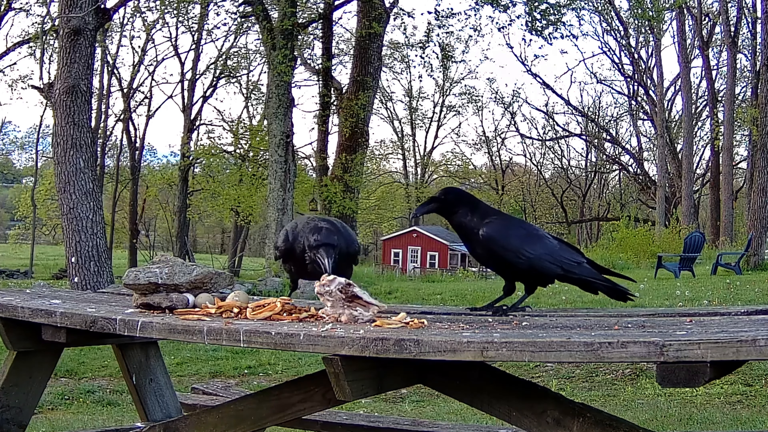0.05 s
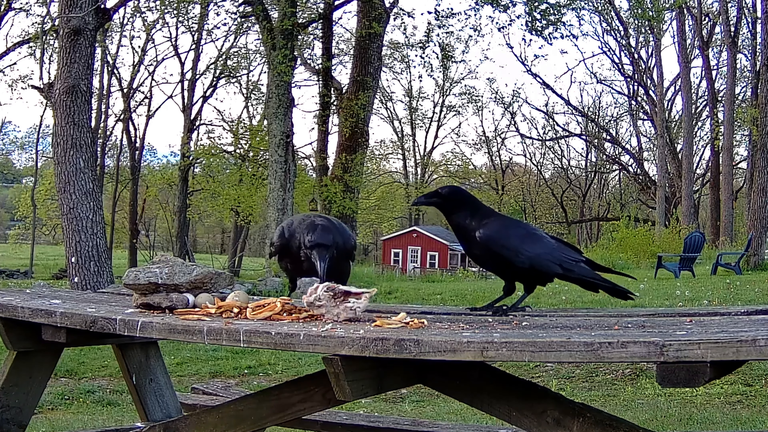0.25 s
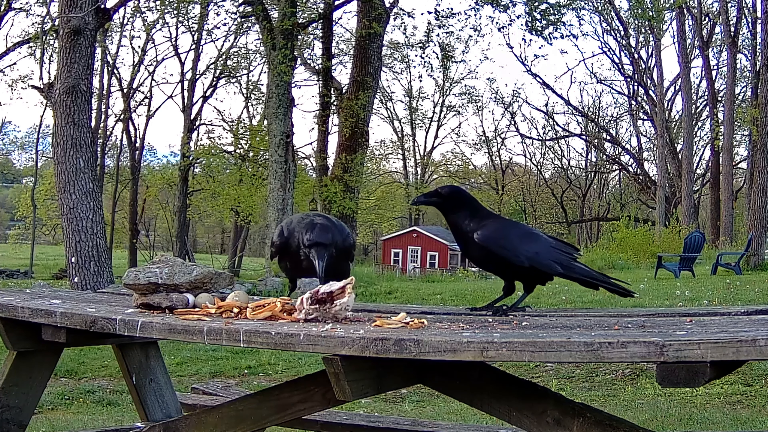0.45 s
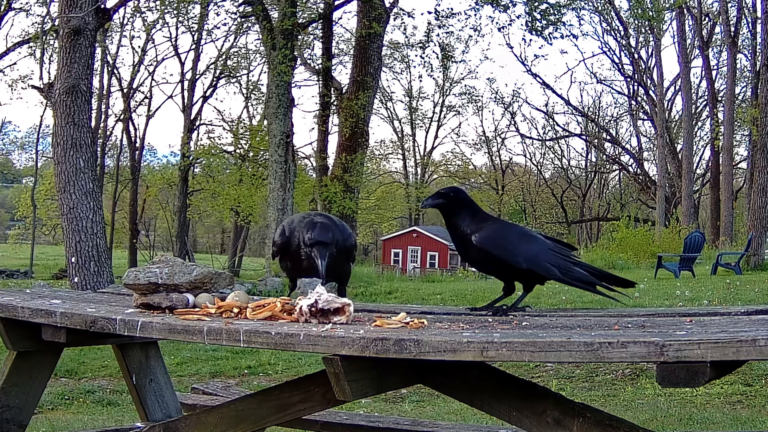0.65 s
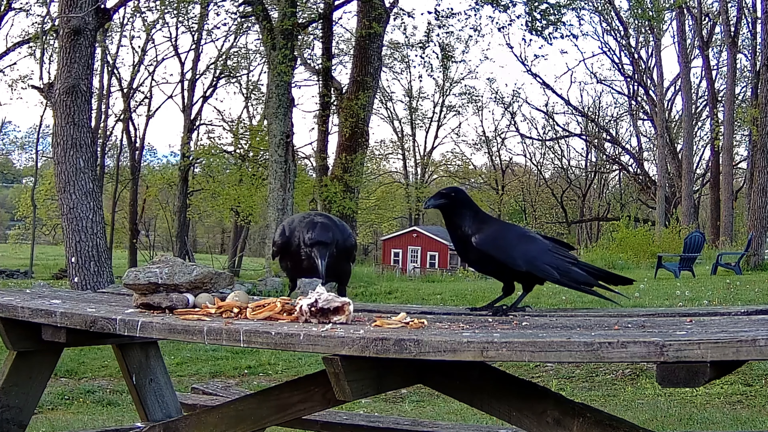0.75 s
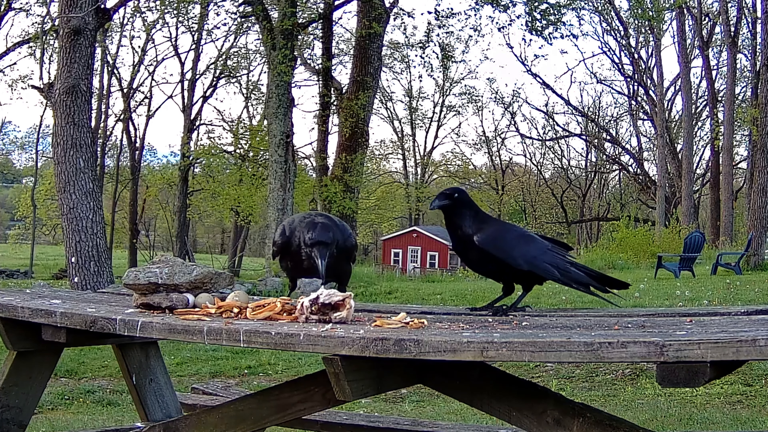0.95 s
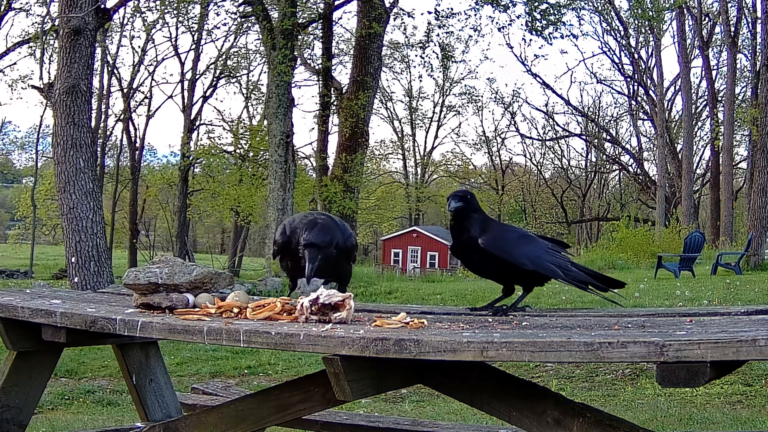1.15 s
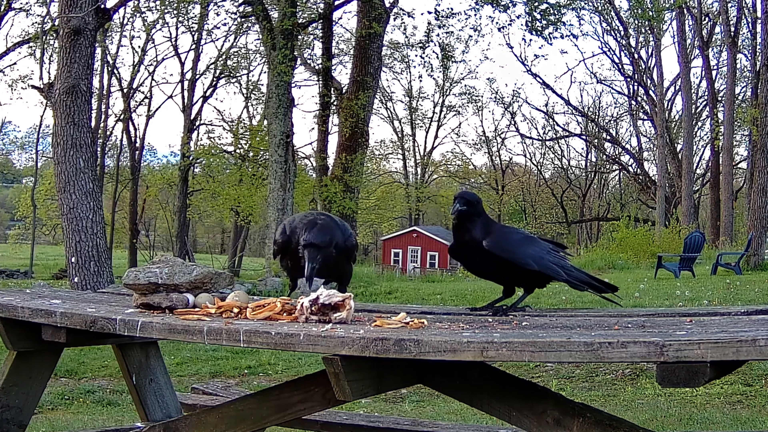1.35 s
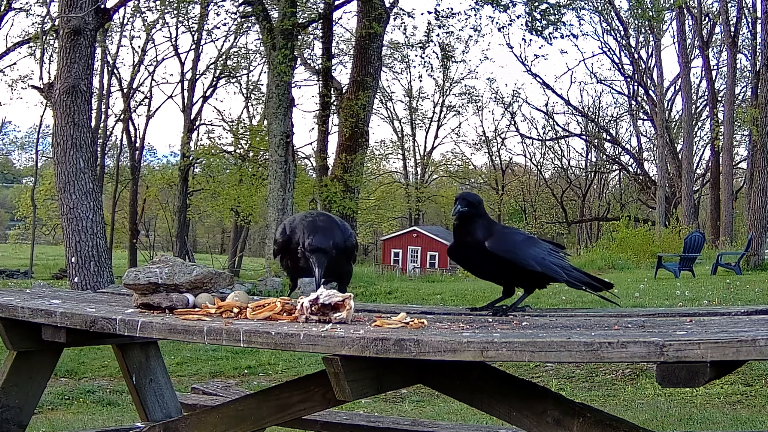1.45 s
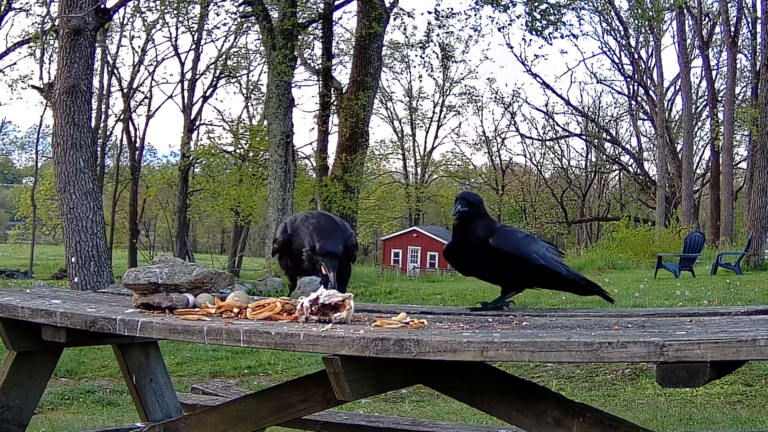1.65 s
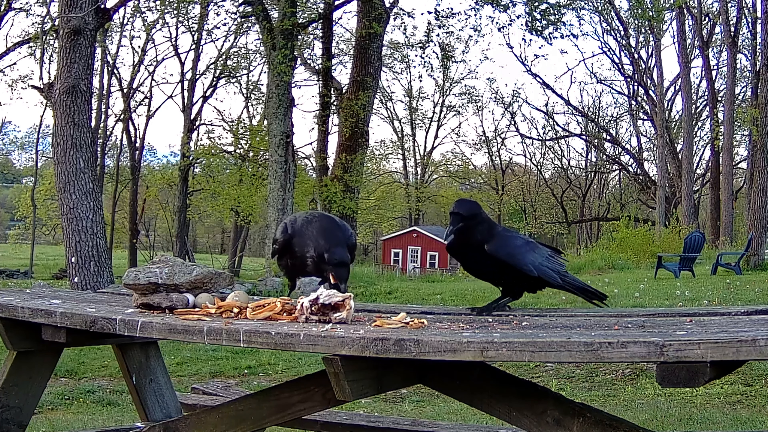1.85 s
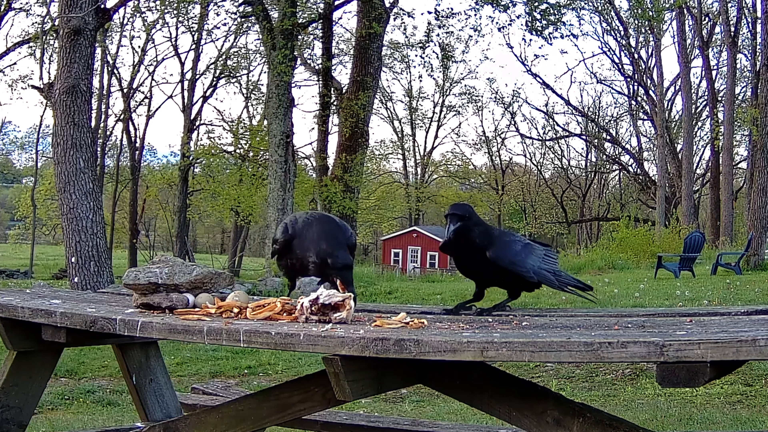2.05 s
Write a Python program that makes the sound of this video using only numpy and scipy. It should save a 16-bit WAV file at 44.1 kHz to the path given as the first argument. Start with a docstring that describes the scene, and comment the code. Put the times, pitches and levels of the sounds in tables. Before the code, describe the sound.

A raven gives one loud, harsh croak close to the microphone. After a pause come a low rattle and two softer croaks. Songbirds whistle and chirp faintly at the edge of a wood, over a soft rumble of air.

```python
"""Ravens at a picnic table

Two ravens feed close to the microphone at the edge of a wood. One gives a loud, harsh croak; a low
rattle and two softer croaks follow. Each call is a run of slow throat pulses that ring the windpipe.
Songbirds whistle far off in the trees, a small bird chirps nearby, and the air rumbles faintly."""
import sys
import numpy as np
from scipy import signal
from scipy.fft import rfft, irfft
from scipy.io import wavfile
from scipy.ndimage import uniform_filter1d

SR = 44100
rng = np.random.default_rng(int(sys.argv[2]) if len(sys.argv) > 2 else 0)


def put_to_file(sound):
    """Save the sound as 16-bit audio at rate SR, in the file named by the first command-line argument."""
    columns = np.atleast_2d(sound).T  # one column per channel
    safe = np.clip(columns, -1, 1)
    whole_steps = np.round(safe * 32767)
    wavfile.write(sys.argv[1], SR, whole_steps.astype(np.int16))


N = 92610


def amp(db):
    """Decibels to gain."""
    return 10 ** (np.asarray(db) / 20)


def unit(x):
    """Scales to rms 1."""
    return x / np.sqrt(np.mean(x ** 2) + 1e-20)


def add(mix, start_s, sound):
    """Mixes a sound in at a time."""
    part = mix[max(round(start_s * SR), 0):][:len(sound)]
    part += sound[:len(part)]


def colour(x, points):
    """Filters by a curve of freq_hz, gain_db points."""
    hz, db = np.transpose(points)
    log_hz = np.log(np.fft.rfftfreq(len(x), 1 / SR) + 1)
    return irfft(rfft(x) * amp(np.interp(log_hz, np.log(hz), db)), len(x))


def echoes(x, t60_s, delay_s, dull_hz):
    """Scattered reflections that die away and lose treble."""
    t = np.arange(SR) / SR
    taps = rng.standard_normal(SR) * (rng.random(SR) < 1 / 20)
    taps *= (t > delay_s) * amp(-60 * t / t60_s)
    taps = signal.lfilter(*signal.butter(1, dull_hz, fs=SR), taps / np.linalg.norm(taps))
    return signal.fftconvolve(x, taps)[:N]


# Open air at the wood's edge: freq_hz, relative_db
AIR_SPECTRUM = [(28, -35.5), (48, 0.5), (119, -2.5), (172, -14), (254, -12), (419, -25.5), (933, -15.5),
                (2820, -25), (6410, -40.5), (8500, -53.5), (11000, -94)]


def air():
    """Low rumble and a soft distant wash all around the microphone."""
    return amp(-41.5) * unit(colour(rng.standard_normal(N), AIR_SPECTRUM))


def pulses(call, tone=((0, 0),)):
    """Time and level of each throat pulse, and the phase in turns of the tone that it chops."""
    times, rate_hz, db = np.transpose(call)
    t = np.arange(times[0], times[-1], 1 / SR)
    count = np.cumsum(np.interp(t, times, rate_hz)) / SR
    starts = np.interp(np.arange(int(count[-1]) + 1), count, t)
    tone_turns = np.cumsum(np.interp(t, *np.transpose(tone))) / SR
    return zip(starts, np.interp(starts, times, db), np.interp(starts, t, tone_turns))


def ring(throat, db, tilt_db_per_octave, turns, glide):
    """One pulse rings the throat, a little differently each time; the ring bends upward by glide."""
    uneven_db, pitch_jitter, slip_turns, glide_ms = 1.3, 0.014, 0.055, 4.4
    hz, gain_db, rise_ms, decay_ms = np.transpose(throat)[:, :, None]
    ms = np.arange(SR // 32) * 1000 / SR
    gain_db = gain_db + uneven_db * rng.standard_normal(hz.shape)
    envelope = (1 - np.exp(-(ms / rise_ms) ** 2)) * np.exp(-ms / decay_ms)
    envelope *= amp(gain_db + tilt_db_per_octave * np.log2(hz / hz[0])) / envelope.max(1, keepdims=True)
    hz = hz * (1 + pitch_jitter * rng.standard_normal(hz.shape))
    bent_ms = ms - rise_ms / 2 + glide * glide_ms * np.log(np.cosh((ms - rise_ms) / glide_ms))
    phase = turns + slip_turns * rng.standard_normal(hz.shape) + hz * bent_ms / 1000
    wave = (envelope * np.sin(2 * np.pi * phase)).sum(0)
    return amp(db) * wave / np.sqrt(np.sum(wave ** 2) / (SR / 100))  # as much energy as 10 ms at db


# The throat passes little bass: freq_hz, gain_db
THROAT_BASS_CUT = [(250, -24), (390, 0.5)]
# Colour of the rasp on each pulse: freq_hz, hollow_db, open_db
RASP_SPECTRA = [(1300, -23.5, -25.5), (1645, 13.5, 10.5), (2100, 4, 1.5), (2277, 11.5, 6),
                (2720, -18.5, -2.5), (3020, -12, 0.5), (3180, 5.5, 5), (3480, 3.5, 1.5), (3820, 7, 11),
                (4240, -15.5, 1), (4340, -15, -10.5), (4850, 4, -1), (5500, 3, 4.5), (6390, -3, -2),
                (7230, -13, -11), (7470, -12, -15), (9120, -50, -50)]


def voice(beats, throat_at, full_db, brighten, rasp_db, rasp_follow, glide=0.032, snap=1.5, opening=0):
    """Throat pulses, brighter with effort, each with a snap and a rasp that fills as the throat opens."""
    shimmer_db, rasp_decay_ms, rasp_floor = 0.5, 4, 0.11
    body, puffs = np.zeros(N), np.zeros(N)
    ms = np.arange(SR // 70) * 1000 / SR
    for start_s, db, turns in beats:
        throat, effort_db = throat_at(start_s), db - full_db
        pulse_db = db + shimmer_db * rng.standard_normal()
        add(body, start_s, ring(throat, pulse_db, brighten * effort_db, turns, glide))
        puff = (np.exp(-ms / rasp_decay_ms) + rasp_floor) * rng.standard_normal(len(ms))
        puff[0] += snap
        rise_s = np.mean(throat, 0)[2] / 1000
        add(puffs, start_s + rise_s, amp(full_db + rasp_follow * effort_db) * puff)
    hz, hollow_db, open_db = np.transpose(RASP_SPECTRA)
    rasp = colour((1 - opening) * puffs, np.c_[hz, hollow_db])
    rasp += colour(opening * puffs, np.c_[hz, open_db])
    return colour(body, THROAT_BASS_CUT) + amp(rasp_db) * rasp


# Single low clucks at the table: start_s, level_db
CLUCKS = [(.013, -41), (.532, -37), (0.663, -38.5), (1.334, -41.5), (1.344, -35.5), (1.373, -36)]
# The low rattle: time_s, pulse_rate_hz, level_db
RATTLE = [(1.4033, 73.3, -33.2), (1.42, 67.6, -42.3), (1.45, 65.1, -38.2), (1.48, 63.8, -25.7),
          (1.52, 63.9, -24.3), (1.56, 62.9, -28.8), (1.591, 60.6, -25.6), (1.607, 63.7, -36.2),
          (1.626, 66.1, -41)]
# Throat resonances, beak shut: pitch_hz, relative_db, rise_ms, decay_ms
THROAT_SHUT = [(457, -4, 2.36, 5.9), (548.5, 3.5, 2.93, 4.45), (1048, -16, 2.7, 2.4)]


def clucks_and_rattle():
    """Lone throat pulses and one slow run of them, close by but quiet behind a shut beak."""
    clucks = [(start_s, db, 0) for start_s, db in CLUCKS]
    return voice([*clucks, *pulses(RATTLE)], lambda s: THROAT_SHUT,
                 full_db=-37.5, brighten=0.45, rasp_db=-61, rasp_follow=0.84)


# Dull thumps on the table, peaking halfway through swell_s: start_s, pitch_hz, peak_db, swell_s
PLANK_THUMPS = [(.228, 111, -28.5, 0.018), (.234, 185, -31, 0.012), (1.69, 172.3, -41, 0.045)]
# Small dry ticks of beaks at the food: start_s, level_db
BEAK_TICKS = [(0.586, -45.5), (1.587, -42), (1.604, -42), (1.622, -44)]


def feeding():
    """Beaks tick and the planks thump, close to the microphone."""
    tick_hz, half_width_hz, tick_decay_s = 6120, 320, 0.0019
    out, t = np.zeros(N), np.arange(SR // 5) / SR
    band = signal.butter(2, [tick_hz - half_width_hz, tick_hz + half_width_hz], "band", fs=SR)
    for start_s, db in BEAK_TICKS:
        hiss = unit(signal.lfilter(*band, rng.standard_normal(len(t))))
        add(out, start_s, amp(db) * hiss * np.exp(-t / tick_decay_s))
    for start_s, hz, db, swell_s in PLANK_THUMPS:
        envelope = 2 * t / swell_s * np.exp(1 - 2 * t / swell_s)
        add(out, start_s, amp(db) * envelope * np.sin(2 * np.pi * hz * t))
    return out


# The loud croak, at close range: time_s, pulse_rate_hz, level_db
LOUD_CROAK = [(0.2343, 114.2, -26.8), (0.243, 109.0, -17.8), (0.263, 98.4, -18.6), (0.275, 92.8, -13.0),
              (0.318, 88.2, -13.0), (0.33, 87.0, -15.5), (0.353, 84.5, -13.0), (0.364, 83.4, -15.5),
              (0.3755, 90.5, -20.5), (0.388, 82.5, -11.4), (0.413, 78.7, -10.2), (0.464, 74.3, -11.4),
              (0.479, 75.0, -21.0), (0.492, 73.7, -24.2), (0.508, 72.6, -16.3)]
# A second, higher tone in the throat, chopped by the pulses: time_s, pitch_hz
CROAK_TONE = [(.31, 728), (.35, 748), (.39, 780), (.45, 814)]
# Throat resonances as the croak starts and as it ends: pitch_hz, relative_db, rise_ms, decay_ms
THROAT_START = [(419, 1, 0.64, 1.62), (582, -1, 0.079, 2.9), (721, 0.5, 0.83, 5.3), (1133, 4.5, 0.32, 3.5),
                (1268, -12, 1, 2.3), (1820, -15, 0.09, 1.3)]
THROAT_END = [(528, -7.5, 0.7, 7.2), (612, -4, 1.42, 2), (831, -17, 2.4, 6.5), (1128, 3.5, 2.9, 1.96),
              (1315, -4.5, 3.2, 0.95), (1740, -24.5, 2.4, 1.4)]


def loud_croak():
    """The throat shifts shape as the pulses slow down; the rasp fills out at the climax."""
    shift_s, climax_s = (0.345, 0.425), (0.37, 0.41, 0.465, 0.495)

    def throat_at(time_s):
        share = np.interp(time_s, shift_s, [0, 1])
        return (1 - share) * np.array(THROAT_START) + share * np.array(THROAT_END)
    opening = np.interp(np.arange(N) / SR, climax_s, [0, 1, 1, 0])
    return voice(pulses(LOUD_CROAK, CROAK_TONE), throat_at, full_db=-8.5, brighten=0.35,
                 rasp_db=-7.5, rasp_follow=1.49, glide=0.035, snap=5.4, opening=opening)


def song(contours, waver, fade_s):
    """Nearly pure gliding whistles with a slight waver."""
    out = np.zeros(N)
    for contour in contours:
        times, hz, db = np.transpose(contour)
        t = np.arange(times[0], times[-1], 1 / SR)
        wobble = unit(uniform_filter1d(rng.standard_normal(len(t)), size=120))
        pitch_hz = uniform_filter1d(np.interp(t, times, hz), size=200) * (1 + waver * wobble)
        fade = np.clip(np.minimum(t - times[0], times[-1] - t) / fade_s, 0, 1)
        tone = np.sqrt(2) * np.sin(2 * np.pi * np.cumsum(pitch_hz) / SR)
        add(out, times[0], fade * amp(np.interp(t, times, db)) * tone)
    return out


# Whistled phrases far off in the trees: time_s, pitch_hz, relative_db
FAR_WHISTLES = [
    [(.475, 2296, -50), (.5, 2480, -34.5), (.522, 2315, -37), (.543, 2452, -35), (.56, 2258, -38),
     (.582, 2364, -38), (.605, 2210, -38.5), (.626, 2312, -41.5), (.66, 2238, -50), (.73, 2180, -47)],
    [(.872, 2262, -48), (.9, 2320, -39), (.936, 2300, -39), (.965, 2150, -56)],
    [(.922, 3386, -43.5), (.952, 3387, -45.5)],
    [(1.036, 2578, -41), (1.068, 2310, -48), (1.105, 2500, -36)],
    [(1.245, 2210, -62.5), (1.272, 2867, -41.5), (1.29, 2850, -56)],
    [(1.55, 3050, -58), (1.58, 2932, -43), (1.625, 2988, -62), (1.68, 2960, -43), (1.71, 2580, -57)],
]
# Faint high chirps, just as distant: time_s, pitch_hz
FAR_CHIRPS = [
    [(.712, 6550), (.75, 6120), (.795, 6620)],
    [(1.75, 6000), (1.85, 5270), (1.89, 5520)],
]
# Chirps of a small nearby bird, with a faint echo of the first: time_s, pitch_hz, level_db
NEAR_CHIRPS = [
    [(1.879, 3530, -55), (1.89, 4710, -40), (1.91, 5770, -34), (1.919, 6000, -54)],
    [(1.96, 4300, -49), (1.979, 4270, -45.5)],
    [(2.0, 5430, -39.5), (2.012, 5200, -53), (2.026, 4030, -43.5), (2.042, 5820, -34.5), (2.049, 5920, -32),
     (2.059, 5910, -42)],
]


def songbirds(faint_db=-61):
    """Far whistles and nearer chirps, echoing among the trees."""
    faint = [[(time_s, hz, faint_db) for time_s, hz in chirp] for chirp in FAR_CHIRPS]
    far = song(FAR_WHISTLES + faint, waver=0.0081, fade_s=0.0055)
    near = song(NEAR_CHIRPS, waver=0.017, fade_s=0.0015)
    far_echo = amp(-5.5) * echoes(far, t60_s=0.36, delay_s=0.006, dull_hz=7980)
    near_echo = amp(-8.5) * echoes(near, t60_s=0.5, delay_s=0.0023, dull_hz=11000)
    return amp(-1) * far + far_echo + near + near_echo


# Two softer croaks at the table: time_s, pulse_rate_hz, level_db
SOFT_CROAK = [(1.6808, 99.0, -37), (1.7, 95.5, -28), (1.714, 89.3, -39.2), (1.75, 84.2, -36.4),
              (1.79, 82.2, -25), (1.833, 75.4, -20.5), (1.847, 75.7, -26), (1.889, 70.0, -25.0),
              (1.917, 67.5, -41.1), (1.936, 66.7, -38.6)]
LAST_CROAK = [(2.008, 99.2, -29.5), (2.02, 80.67, -33.5), (2.071, 76.3, -43), (2.083, 73.3, -25.5),
              (2.1, 71.8, -24)]
# Throat resonances of both: pitch_hz, relative_db, rise_ms, decay_ms
THROAT_SOFT = [(479, -4, 1.83, 3.9), (599, 6, 1.92, 1.63), (774, -0.5, 1.52, 1.7), (1170, -3, 3.9, 2.24),
               (1385, -4.5, 3.8, 1.38), (1820, -19, 3.6, 2.9), (2350, -25.5, 4, 2.8)]


def soft_croaks():
    """Two gentler runs of slowing pulses ring a throat that holds its shape."""
    first = voice(pulses(SOFT_CROAK), lambda s: THROAT_SOFT,
                  full_db=-24.5, brighten=0.48, rasp_db=-21, rasp_follow=0.73, glide=0.14)
    last = voice(pulses(LAST_CROAK), lambda s: THROAT_SOFT,
                 full_db=-9.5, brighten=0.4, rasp_db=-24, rasp_follow=0.53)
    return first + last


def scene():
    """Ravens up front, thrown back by the table and faintly by the trees, with the wood behind."""
    ravens = loud_croak() + clucks_and_rattle() + soft_croaks()
    table = amp(-15.5) * echoes(ravens, t60_s=0.16, delay_s=0.0032, dull_hz=7000)
    trees = amp(-24.0) * echoes(ravens, t60_s=0.78, delay_s=0.0089, dull_hz=575)
    return (ravens + table + trees + songbirds() + feeding() + air())[None]


def record(dry):
    """One microphone: the loudest pulses overload softly, then the top treble is cut."""
    ceiling, knee, cutoff_hz = 0.76, 7, 8600
    squashed = dry / (1 + abs(dry / ceiling) ** knee) ** (1 / knee)
    lowpass = signal.firwin(201, cutoff_hz, window=("kaiser", 9), fs=SR)
    return signal.oaconvolve(squashed, lowpass[None], "same")


dry = scene()
out = record(dry)
put_to_file(out)
```